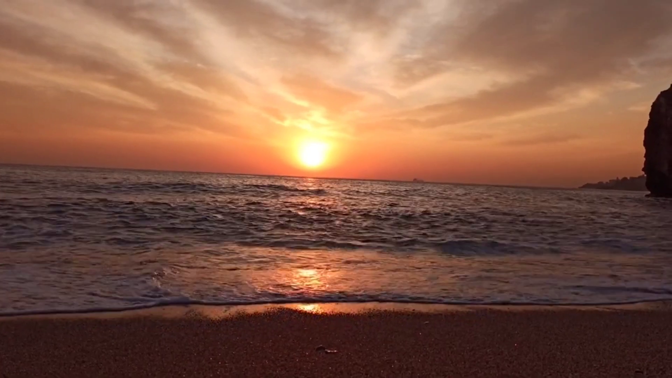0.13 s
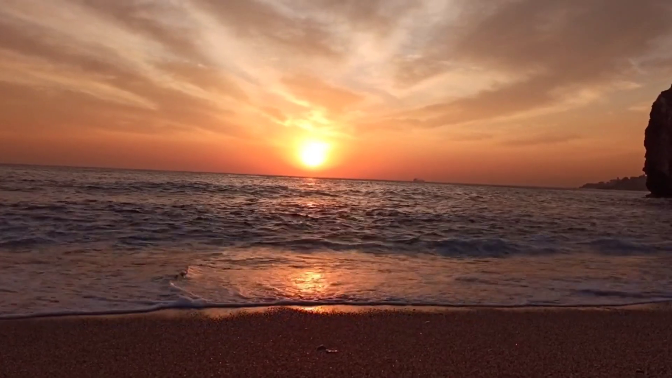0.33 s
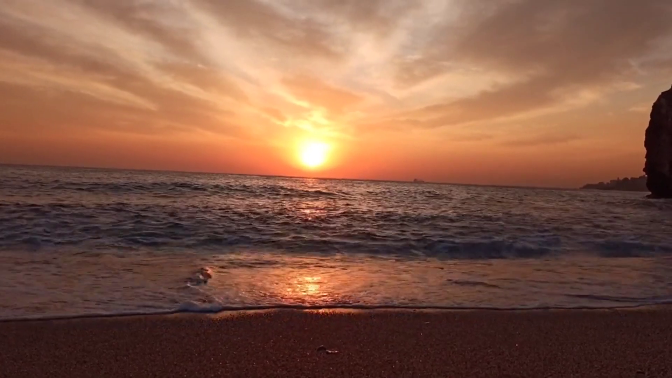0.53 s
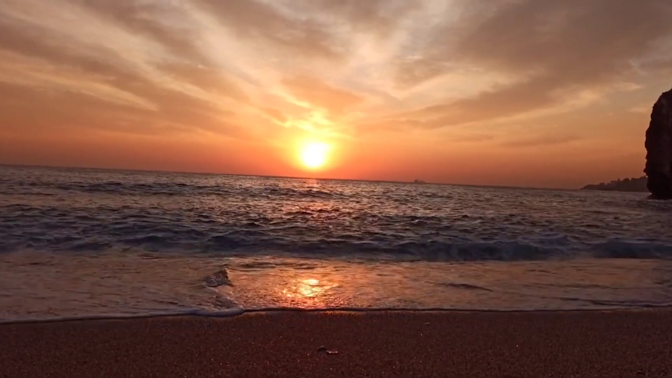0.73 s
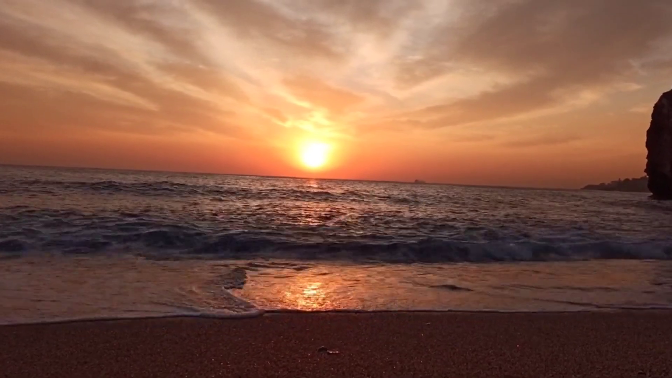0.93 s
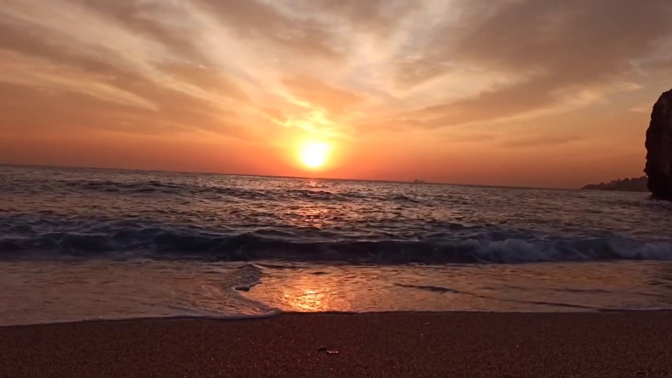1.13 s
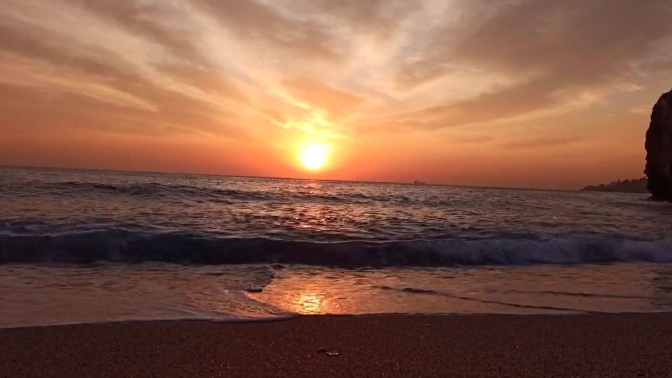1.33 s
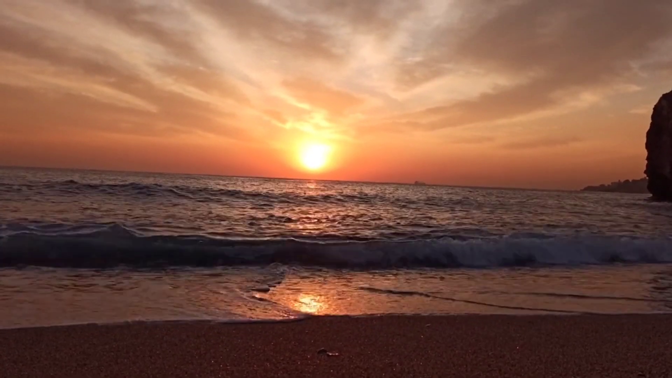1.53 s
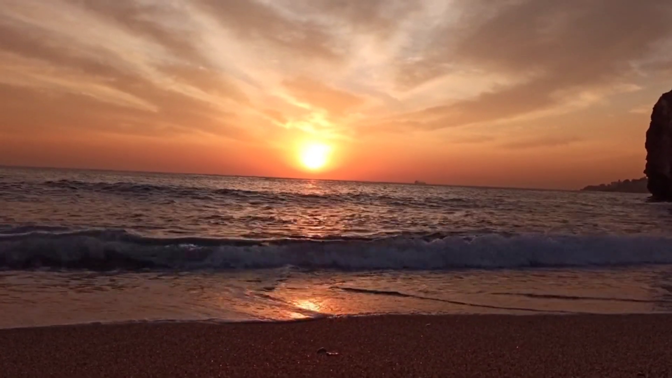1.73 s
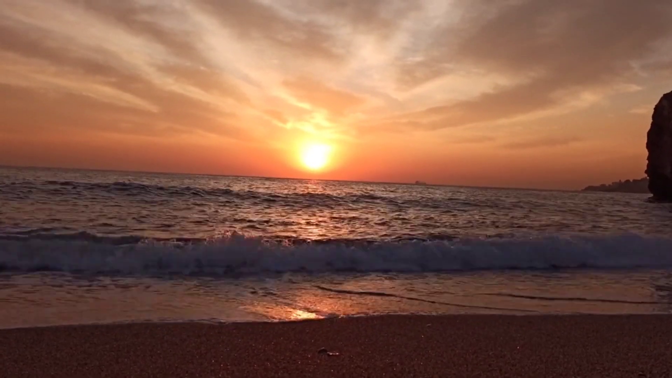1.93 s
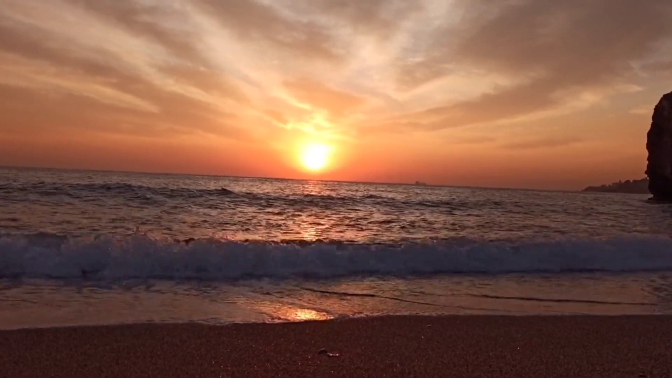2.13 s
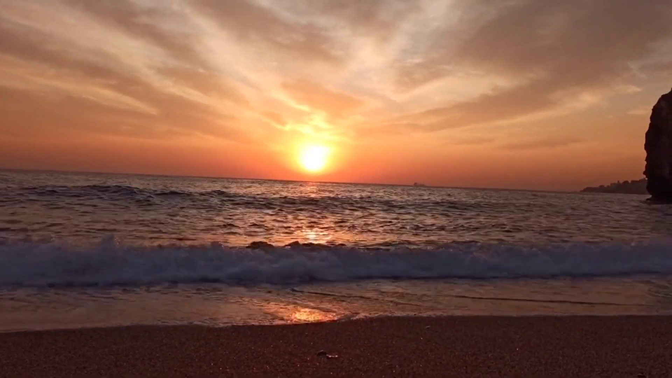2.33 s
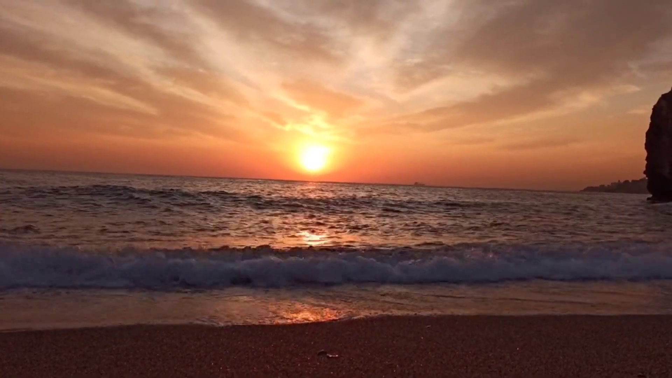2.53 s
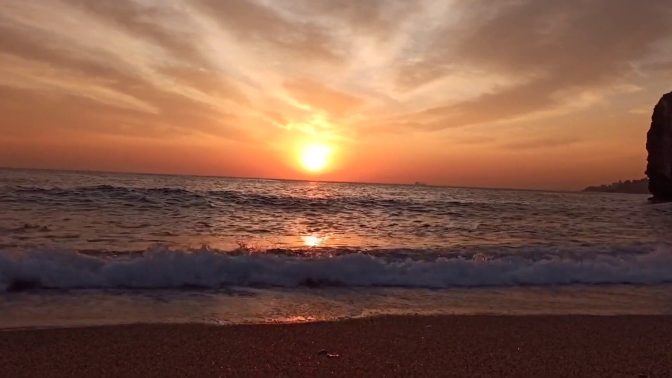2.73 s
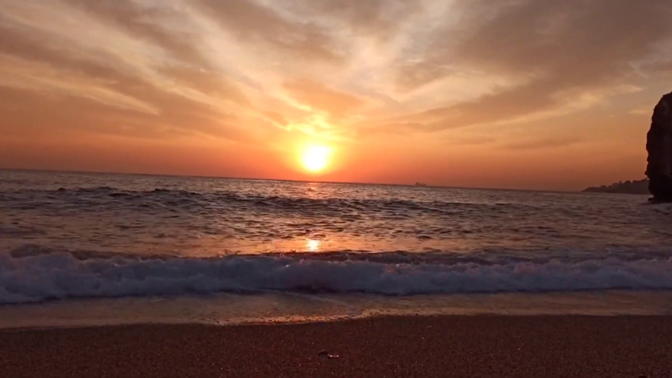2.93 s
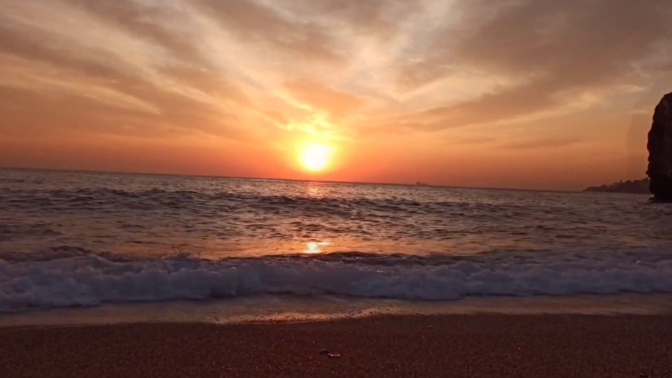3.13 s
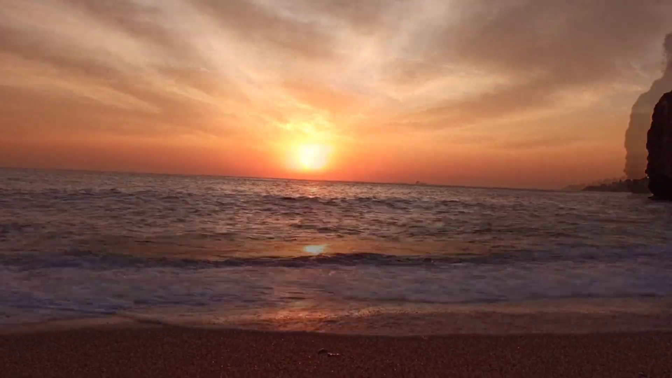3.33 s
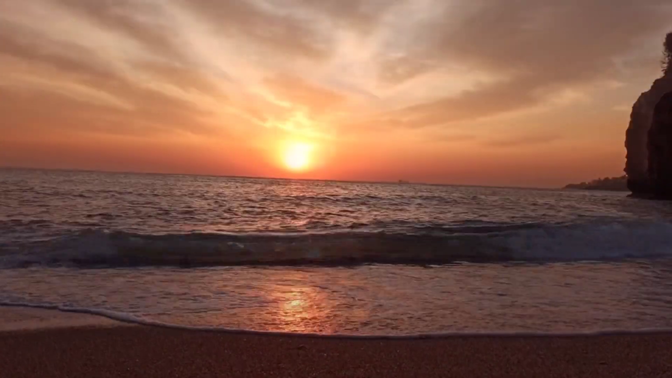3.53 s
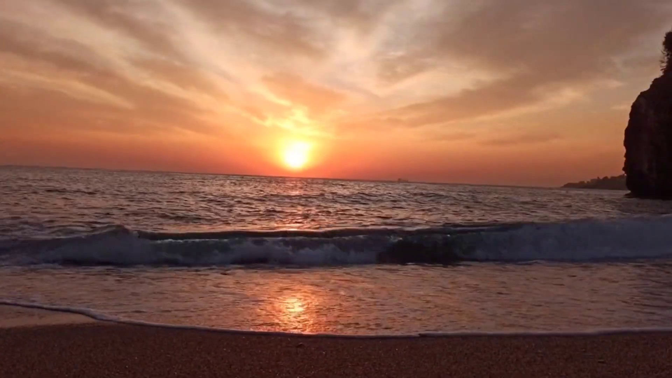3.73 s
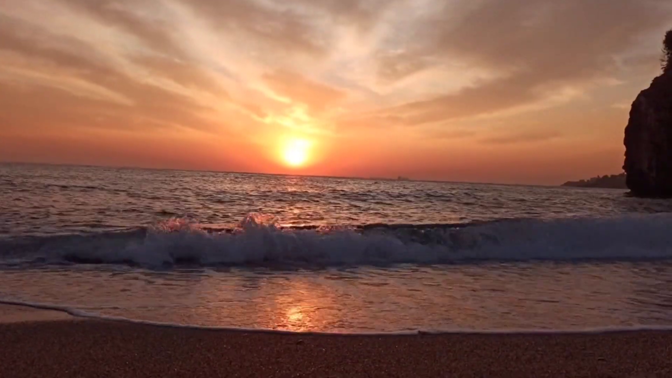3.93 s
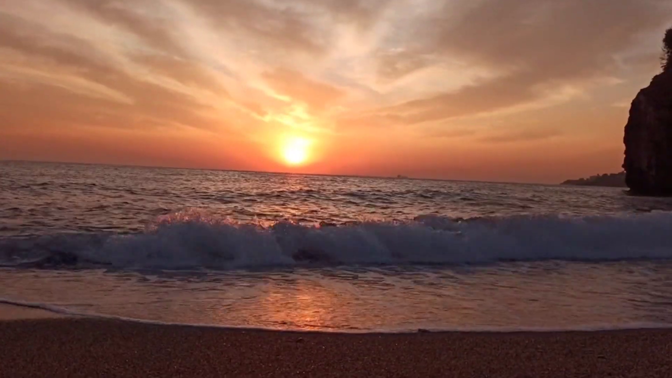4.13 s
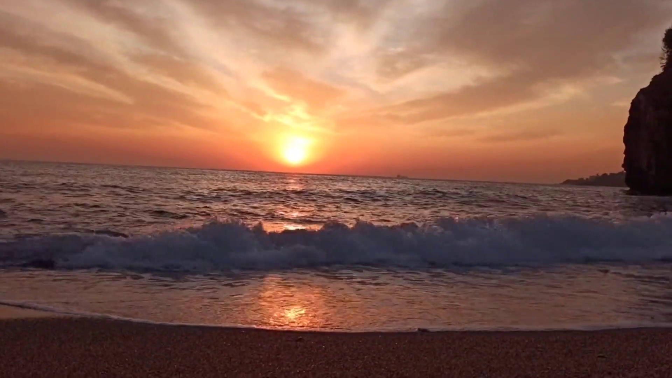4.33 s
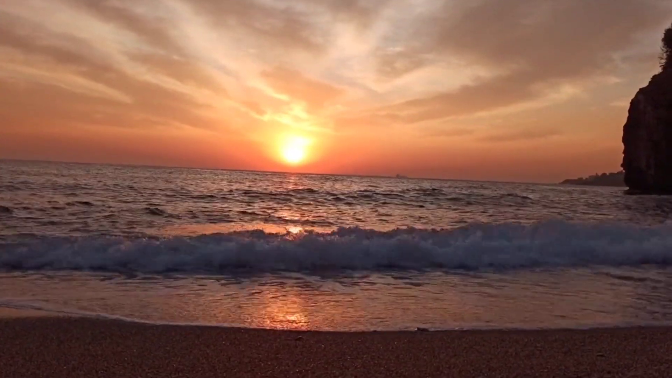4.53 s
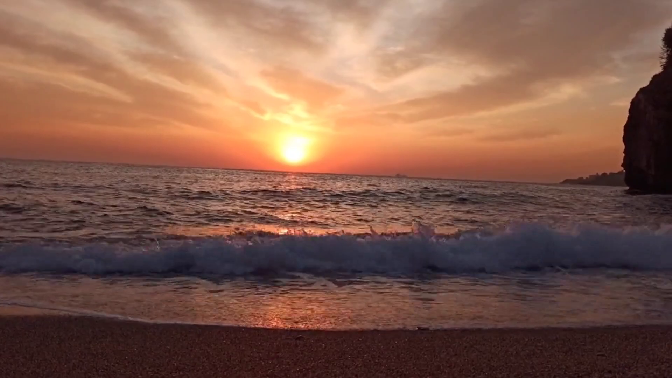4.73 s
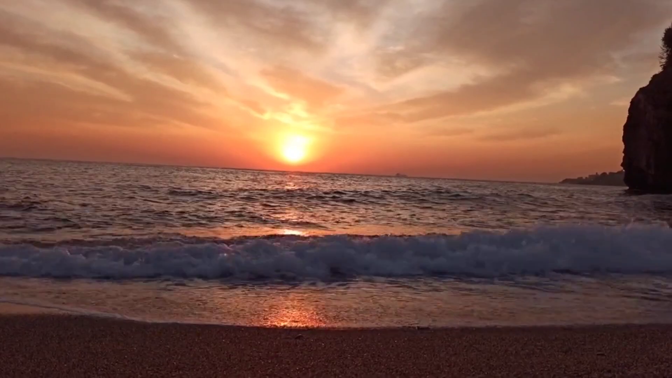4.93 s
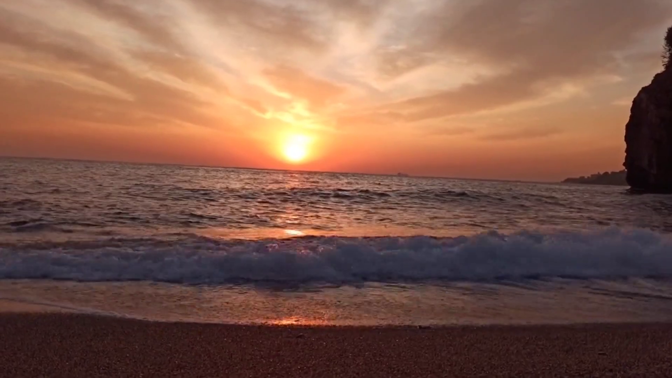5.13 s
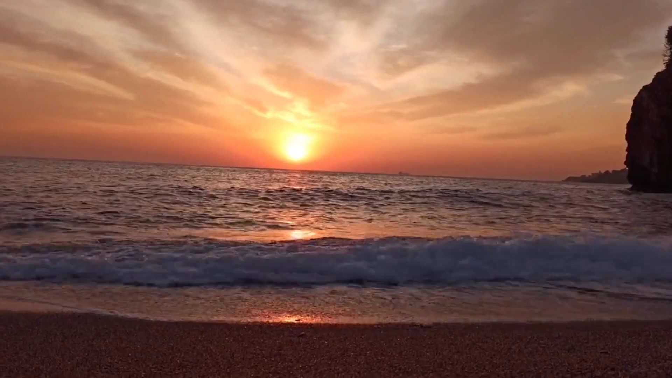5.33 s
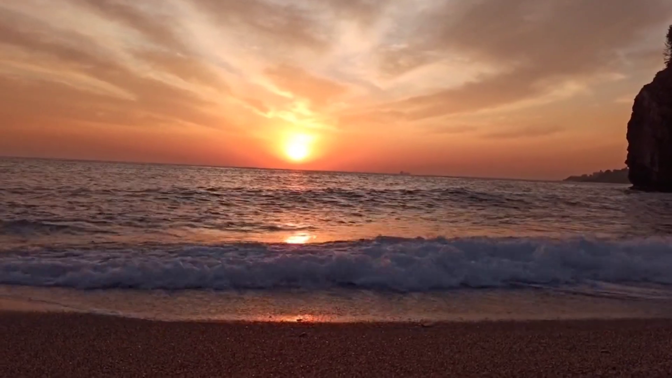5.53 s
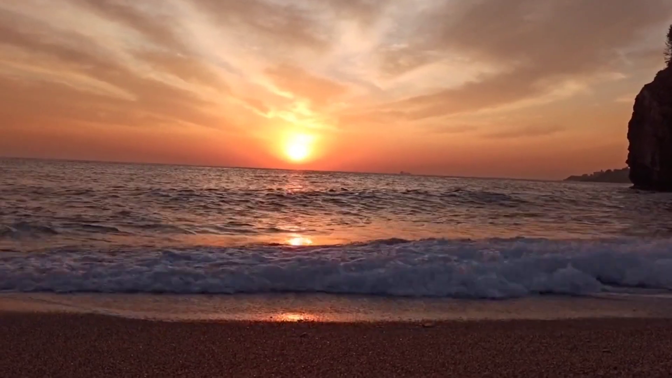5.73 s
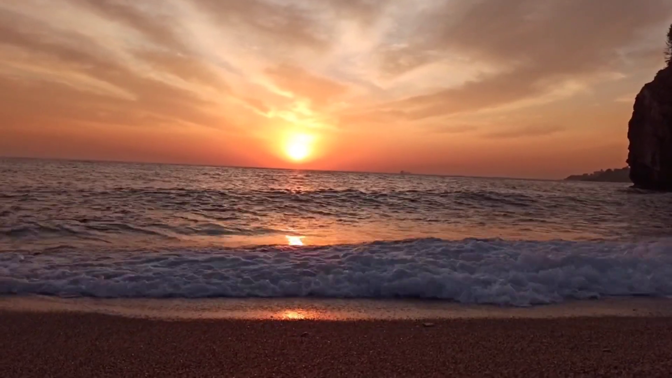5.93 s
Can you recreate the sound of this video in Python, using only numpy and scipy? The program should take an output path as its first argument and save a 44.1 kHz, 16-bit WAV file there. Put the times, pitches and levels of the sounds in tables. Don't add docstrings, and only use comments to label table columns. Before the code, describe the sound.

Quiet shoreline with low rumble, then a wave tumbles and hisses over sand, eases, and a second heavier wave crashes and fades.

```python
import sys
import numpy as np
from scipy import signal
from scipy.fft import rfft, irfft, next_fast_len
from scipy.io import wavfile

SR = 44100
rng = np.random.default_rng(int(sys.argv[2]) if len(sys.argv) > 2 else 0)


def bounce(signal):
    frames = np.transpose(np.atleast_2d(signal))
    limited = np.clip(frames, -1, 1)
    pcm = np.round(limited * 32767).astype(np.int16)
    wavfile.write(sys.argv[1], SR, pcm)


def gain_from_db(level_db):
    decades = np.asarray(level_db, float) / 20
    return 10 ** decades


N = 267687
FRAME, GRID = 1024, 488
FIZZ_SPLIT_HZ, SIZZLE_SPLIT_HZ, GAP_HZ = 2300, 4760, 8525
MEAN_FORCE_DB, MEAN_WASH_DB = -44, -50


def rms_one(x):
    return x / np.sqrt(np.mean(x ** 2) + 1e-20)


def in_time(rows):
    s, *columns = np.transpose(rows)
    return [np.interp(np.arange(N) / SR, s, column) for column in columns]


def at_hz(points, hz):
    table_hz, values = np.transpose(points)
    return np.interp(np.log(hz), np.log(table_hz), values)


def fft_grid():
    size = next_fast_len(N)
    return size, np.maximum(np.fft.rfftfreq(size, 1 / SR), 1)


def drift(rate_hz, shape=()):
    knots = rng.standard_normal((*shape, 400))
    place = np.arange(N) / SR * rate_hz
    index = place.astype(int)
    return knots[..., index] + (place - index) * (knots[..., index + 1] - knots[..., index])


def lean(pan_db):
    return gain_from_db(np.array([pan_db, -pan_db]) / 2)


def ring(clicks, hz, t60_s):
    radius = gain_from_db(-60 / (t60_s * SR))
    angle = 2 * np.pi * hz / SR
    return signal.lfilter([0, np.sin(angle)], [1, -2 * radius * np.cos(angle), radius ** 2], clicks + 1e-18)


def stepped_noise(steps, surge_db):
    size = next_fast_len(N)
    hz = np.fft.rfftfreq(size, 1 / SR)
    white = rfft(rng.standard_normal((2, size)))
    out = 0
    for (low, left_db, right_db, flicker_db), (high, *_) in zip(steps, steps[1:]):
        band = irfft(white * ((hz >= low) & (hz < high)), size)[:, :N]
        level_db = np.array([[left_db], [right_db]]) + flicker_db * drift(SR / FRAME, (2,))
        out = out + band * gain_from_db(level_db)
    return rms_one(out * gain_from_db(surge_db))


def lapped_basis(first, count):
    n = np.arange(2 * FRAME)[:, None] + .5
    k = first + np.arange(count) + .5
    window = np.sin(np.pi * n / (2 * FRAME))
    return np.sqrt(2 / FRAME) * window * np.cos(np.pi / FRAME * (n + FRAME / 2) * k)


def to_lines(x, basis):
    padded = np.pad(x, ((0, 0), (2 * FRAME - GRID, 3 * FRAME)))
    return np.lib.stride_tricks.sliding_window_view(padded, 2 * FRAME, axis=1)[:, ::FRAME] @ basis


def from_lines(lines, basis):
    pieces = lines @ basis.T
    joined = pieces[:, 1:, :FRAME] + pieces[:, :-1, FRAME:]
    return joined.reshape(2, -1)[:, FRAME - GRID:][:, :N]


# (peak time [s], roar lift [dB], foam lift [dB])
PUSHES = [(0.09, -0.5, 1), (0.85, 0.5, 1), (1.0, 0, 0.5), (1.345, 1, 2), (1.65, -0.5, 2), (1.82, 1.5, 2),
          (2.13, -1.5, 0.5), (2.25, -0.5, 0.5), (2.33, -1.5, 1), (2.6, 3.5, -0.5), (2.86, 1.5, 1),
          (2.97, -1, 0), (3.76, 1, 0), (4.0, -1.5, 0.2), (4.11, -0.5, -0.5), (4.39, 3, 0.5), (4.65, 0, 0),
          (4.8, 1.5, 3), (5.01, 1.5, -0.8), (5.31, 0.5, -0.5), (5.42, 1, 0), (5.63, 1.5, 1)]


def pushes():
    s, *lifts_db = np.transpose(PUSHES)
    coarse = np.arange(0, N + 64, 64)
    since_s = coarse / SR - s[:, None]
    width_s = np.where(since_s < 0, 0.029, 0.044)
    shape = np.exp(-(since_s / width_s) ** 2)
    return [np.interp(np.arange(N), coarse, lift_db @ shape) for lift_db in lifts_db]


# (time [s], roar force [dB], extra large air pockets [dB])
PLUNGE = [(0, -52.5, 4), (.15, -56, 6.5), (.5, -55.5, 3), (.8, -54.5, 0), (1.3, -47, -1), (1.55, -46.5, -2),
          (1.75, -42.5, -0.5), (2.1, -38, -2.5), (2.35, -35, 5.5), (2.62, -40.5, -4), (2.9, -40.5, -2.5),
          (3.38, -50, -2), (3.55, -48, 6.5), (3.95, -35, 0), (4.4, -36.5, 2), (5.05, -38, 1.5),
          (5.45, -41.5, -0.5), (6.06, -51, -1)]


def plunge():
    force_db, pockets_db = in_time(PLUNGE)
    return force_db + pushes()[0], pockets_db


# (time [s], fizz vigour [dB], extra spray [dB], extra large bubbles [dB])
WASH = [(0, -62.5, 1.5, -2), (.3, -64.5, 1.5, -3.5), (.76, -65.5, 2, 2.5), (1.06, -57.5, -0.5, 3),
        (1.25, -56.5, 0, 2.5), (1.58, -50, -0.5, 0.5), (1.75, -47.5, 0, 1), (2.04, -47, 0.5, 1),
        (2.4, -46, 0, -1.5), (2.95, -48.5, -0.5, 2), (3.33, -54, -0.5, 0), (3.57, -55, 3.5, -0.5),
        (3.66, -49, 3, 0), (4.2, -47.5, 2, 0), (4.6, -48.5, 1, -0.5), (5, -48, -0.5, -1), (5.55, -50, 0, 0),
        (6.06, -55, 2, -1.5)]


def wash():
    wash_db, spray_db, large_db = in_time(WASH)
    return wash_db + pushes()[1], spray_db, large_db


def second_swell():
    return .5 + .5 * np.tanh((np.arange(N) / SR - 3.9) / .06)


# (frequency [Hz], density [dB per Hz])
RUMBLE = [(11, -45.5), (18, -31), (32, -7), (64, -5.5), (75, 6.5), (97, -3), (110, 4), (140, -38),
          (240, -120)]
# (time [s], hiss level [dB], rumble lift [dB])
BACKWASH = [(0, -61, 0), (.3, -66.5, 3), (.7, -71, 4.5), (1.2, -64, -5), (1.6, -100, 2), (3, -96, -3),
            (6, -94, 5.5)]
# (low edge [Hz], left [dB], right [dB], flicker [dB]); last row closes the top
DRAIN = [(1570, -1, 1.2, 1.2), (1770, -3.5, 0.81, 1.1), (2240, -1, 2, 0)]


def far_sea(rumble_db=-68):
    hiss_db, lift_db = in_time(BACKWASH)
    size, hz = fft_grid()
    mid, side = rfft(rng.standard_normal((2, size))) * gain_from_db(at_hz(RUMBLE, hz))
    ports = (mid + 0.36 * side * [[1], [-1]]) * lean(-1.8)[:, None]
    rumble = irfft(ports, size)[:, :N]
    hiss = stepped_noise(DRAIN, .8 * drift(7.1))
    return rms_one(rumble) * gain_from_db(rumble_db + lift_db) + hiss * gain_from_db(hiss_db)


# (time [s], centre [Hz])
SPECKS = [(0.081, 9100), (0.266, 9210), (0.522, 9210), (0.615, 9130), (0.754, 9230), (0.847, 9240),
          (0.893, 10160), (0.94, 9260), (1.102, 10120), (1.126, 9230), (1.288, 9220), (1.335, 9220),
          (1.474, 9230), (1.636, 9320), (1.892, 9180), (1.915, 9210), (1.985, 9160), (2.24, 9270),
          (2.588, 9090), (2.635, 10650), (2.728, 9940), (2.867, 9110), (2.983, 10530), (4.028, 10620),
          (4.167, 9150), (4.237, 10580), (4.376, 9910), (4.469, 9250), (4.632, 10750), (4.771, 10440)]


def lone_lines(fringe_share=0.43, fringe_db=7.0, left_db=-4, speck_db=3.5, loss_db_per_khz=7, speck_lines=4):
    first, count, frames = 396, 128, N // FRAME + 4
    hz = (first + np.arange(count)) * SR / (2 * FRAME)
    frame_at = GRID + FRAME * (np.arange(frames) - 1)
    wash_db = in_time(WASH)[0][frame_at.clip(0, N - 1)]
    reach_hz = np.minimum(rng.exponential(200, frames), 420) * (rng.random(frames) < fringe_share)
    size = gain_from_db(wash_db + fringe_db)[:, None] * (hz < GAP_HZ + reach_hz[:, None])
    share = np.full(size.shape, .3)
    for s, centre_hz in SPECKS:
        frame = round((s * SR - GRID) / FRAME) + 1
        near = abs(hz - centre_hz) < 200
        line_db = wash_db[frame] + speck_db - loss_db_per_khz * (centre_hz - 9200) / 1000
        size[frame, near] = gain_from_db(line_db)
        share[frame, near] = speck_lines / near.sum()
    lit = rng.random((2, frames, count)) < share * np.array([.6, 1])[:, None, None]
    signs = rng.choice([-1, 1], lit.shape)
    lines = size * lit * signs * gain_from_db([left_db, 0])[:, None, None]
    return from_lines(lines, lapped_basis(first, count))


# (low edge [Hz], left [dB], right [dB], flicker [dB]); last row closes the top
TOP = [(11580, 0.3, -.8, 0.7), (12300, -1.5, -.8, 1.1), (12900, -0.5, .6, 1.1), (14200, -1.5, -.4, 1.1),
       (15150, -3, -1.2, 1.5), (15550, 0, 0, 0)]


def spray(surge_db):
    wash_db, spray_db, _ = wash()
    level_db = wash_db - 7.5 + spray_db
    pan_db = -8.0 - 0.6 * spray_db - 2.5 * second_swell() + 1.8 * drift(7)
    sides = lean(pan_db)
    sides = sides / np.sqrt(np.mean(sides ** 2, axis=0))
    hiss = stepped_noise(TOP, .6 * surge_db) * sides * gain_from_db(level_db)
    basis = lapped_basis(528, 200)
    lines = to_lines(hiss, basis)
    own = np.sqrt(np.mean(lines ** 2, axis=2, keepdims=True)) + 1e-12
    step_db = np.array([2, -1.6])[:, None, None] + rng.normal(0, 2.2, own.shape)
    step = np.minimum(own[1] * gain_from_db(step_db), own * gain_from_db(7.8))
    lines[0, :, 176:] *= rng.random((lines.shape[1], 1)) < .5
    counts = np.floor(abs(lines / step) ** .75 + .4)
    return from_lines(np.sign(lines) * counts ** (4 / 3) * step, basis)


# (low edge [Hz], left [dB], right [dB], flicker [dB]); last row closes the top
COARSE = [(1000, 3, 6.5, 0.49), (1087.5, 3, 3.5, -2.5), (1200, 3.2, 3.2, 3.4), (1400, .5, 1, 0.1),
          (1599.5, 0.5, 1.3, 0.78), (1853, -0.5, 0.5, 1.9), (2146, 0, -9.5, 2.5), (FIZZ_SPLIT_HZ, 0, 0, 0)]
FINE = [(FIZZ_SPLIT_HZ, 0.94, 0, 1.2), (2749, 1.5, -1, 2), (3106, 1, 0.5, 1.6), (3444.5, 1.5, -0.5, 1.1),
        (4134, 0.5, 0, 0.4), (SIZZLE_SPLIT_HZ, 0, 0, 0)]
SIZZLE = [(SIZZLE_SPLIT_HZ, -4, -5.5, 0.37), (5507, -5, -5, -0.5), (6145, -1.5, 1.5, 1.7),
          (6504, 4, -4.5, 2), (6884, 2, -4.5, -2), (7258, 4, -1, -1.1), (7645, -3.5, -4.5, 0.5),
          (7990, -2.5, -3, 2), (8259, -4.5, -3, 1.4), (GAP_HZ, 0, 0, 0)]


def foam(surge_db):
    force_db, _ = plunge()
    wash_db, spray_db, large_db = wash()
    coarse_db = -48 + large_db + 0.2 * (force_db - MEAN_FORCE_DB) + 0.95 * (wash_db - MEAN_WASH_DB)
    coarse = stepped_noise(COARSE, 0.57 * surge_db) * gain_from_db(coarse_db)
    fine = stepped_noise(FINE, .7 * surge_db) * gain_from_db(wash_db + 1.13 - 0.3 * spray_db)
    sizzle = stepped_noise(SIZZLE, 0.24 * surge_db) * gain_from_db(wash_db + 0.25 + 0.3 * spray_db)
    return (coarse + fine + sizzle * lean(-0.8)[:, None]) * lean(0.25 * drift(9))


# (time [s], peak [dB], pitch [Hz])
SLAPS = [
    (1.354, -25, 326),
    (1.635, -29, 331),
    (1.818, -21, 328),
    (2.044, -19, 307),
    (2.269, -20, 159),
    (2.849, -40, 471),
    (4.401, -24, 315),
    (4.46, -21, 288),
    (4.787, -23, 378),
]
# (start [s], length [s], start pitch [Hz], end pitch [Hz], level [dB])
THUMP = (1.625, .12, 200, 122, -39)


def slaps(cycles=9, under_db=-9):
    out = np.zeros(N)
    for s, peak_db, hz in SLAPS:
        blow = np.zeros(N)
        blow[round(s * SR)] = gain_from_db(peak_db + under_db)
        out += ring(blow, hz, cycles / hz)
    out = signal.sosfilt(signal.butter(2, [110, 900], "band", fs=SR, output="sos"), out)
    start_s, length_s, from_hz, to_hz, level_db = THUMP
    part = np.clip((np.arange(N) / SR - start_s) / length_s, 0, 1)
    pitch_hz = to_hz + (from_hz - to_hz) * (1 - part) ** 2
    thump = np.sin(np.pi * part) * np.sin(2 * np.pi * np.cumsum(pitch_hz) / SR)
    return out + gain_from_db(level_db) * thump


# (frequency [Hz], density [dB per Hz])
CREST_COLOUR = [(12, -65), (20, -38), (32, -57), (37, -42), (58, -17.5), (89, -5.5), (107, -4), (235, -2.5),
                (364, 1), (445, -2), (500, -1), (900, -2), (1100, -5.5), (1430, -43), (2420, -120)]
# (frequency [Hz], likeness [0-1])
LIKENESS = [(60, 1), (99, 1), (160, 0.95), (270, 0.85), (450, 0.75), (740, 0.4), (1220, 0), (2010, 0.03),
            (3330, -0.01), (5500, -0.02), (9080, -0.03), (15000, -0.01)]
# (frequency [Hz], left minus right [dB])
CREST_LEAN = [(30, -4.5), (120, -.9), (400, -0.3), (900, 0.2)]


def crest(bubbles_per_s=7000, spread_db=1.78, low_hz=200, high_hz=480, top_hz=1000):
    force_db, pockets_db = plunge()
    swing_db = force_db - MEAN_FORCE_DB
    boom_db = MEAN_FORCE_DB - 8.5 + 0.89 * swing_db + pockets_db
    body_db = force_db - 4
    small_db = MEAN_FORCE_DB - 4 + 0.99 * swing_db - 0.3 * pockets_db - second_swell()

    sizes = gain_from_db(spread_db * np.minimum(rng.exponential(1, (2, N)), 5)) * rng.choice([-1, 1], (2, N))
    pops = sizes * (rng.random((2, N)) < bubbles_per_s / SR)
    size, hz = fft_grid()
    mid, side = rfft(pops * gain_from_db(.6 * drift(14)), size)
    alike = np.clip(at_hz(LIKENESS, hz), 0, .99) ** 0.61 * (.96 + .04 * np.tanh(hz / 110) ** 2)
    ports = np.sqrt(1 + alike) * mid + np.sqrt(1 - alike) * side * [[1], [-1]]
    cloud = ports * gain_from_db(at_hz(CREST_COLOUR, hz)) * lean(at_hz(CREST_LEAN, hz)) * (hz < top_hz)
    cloud = cloud / (1 + (62 / hz) ** 4)

    low_share = 1 / (1 + (hz / low_hz) ** 6)
    high_share = 1 / (1 + (high_hz / hz) ** 6)
    boom = irfft(cloud * low_share, size)[:, :N]
    body = irfft(cloud * (1 - low_share - high_share), size)[:, :N]
    small = irfft(cloud * high_share, size)[:, :N]
    return rms_one(boom) * gain_from_db(boom_db) + rms_one(body) * gain_from_db(body_db) + rms_one(small) * gain_from_db(small_db)


def scene():
    surge_db = (drift(7.4) + drift(8, (2,))) / np.sqrt(2)
    return far_sea() + lone_lines() + spray(surge_db) + foam(surge_db) + slaps() + crest()


def roll_off(x):
    return signal.sosfilt(signal.butter(12, 15810, fs=SR, output="sos"), x)


def record(dry):
    end_s = 6.0655
    mix = dry * (np.arange(N) < end_s * SR)
    return roll_off(mix)


dry = scene()
out = record(dry)
bounce(out)
```